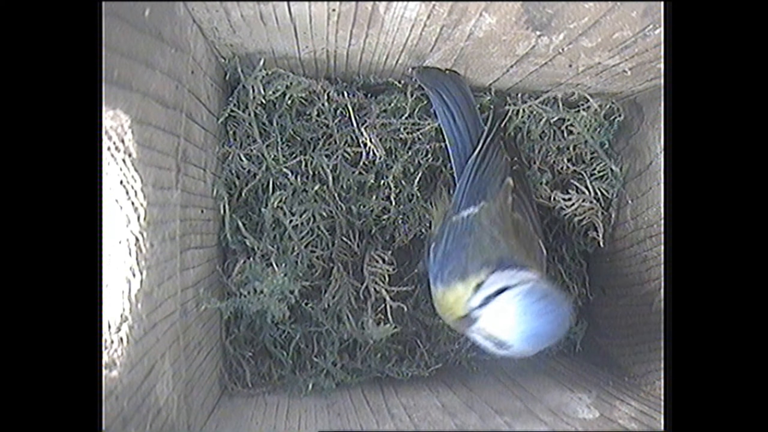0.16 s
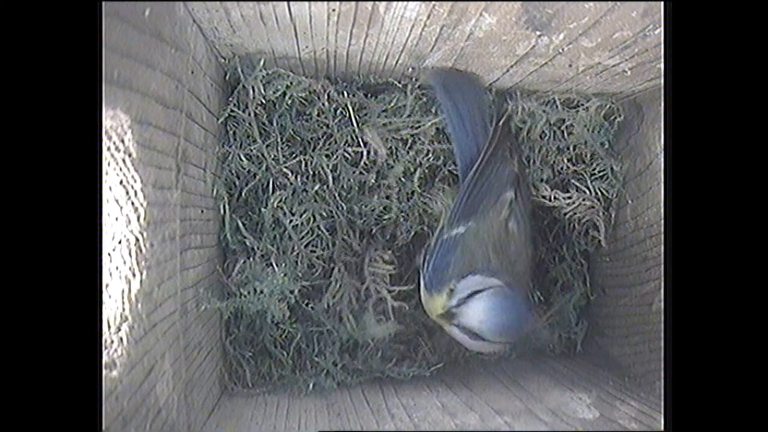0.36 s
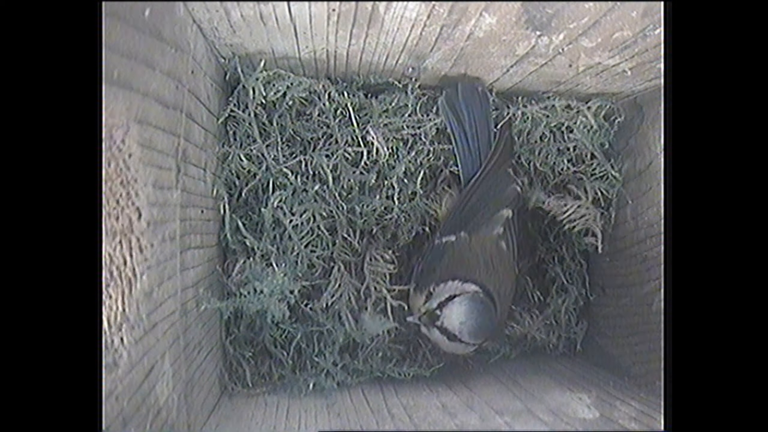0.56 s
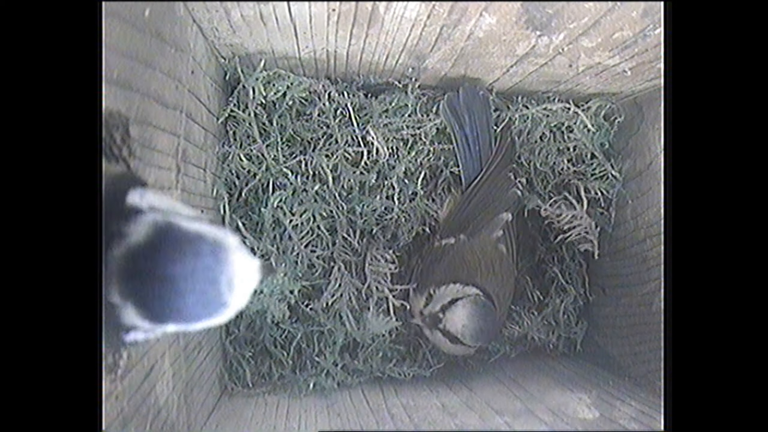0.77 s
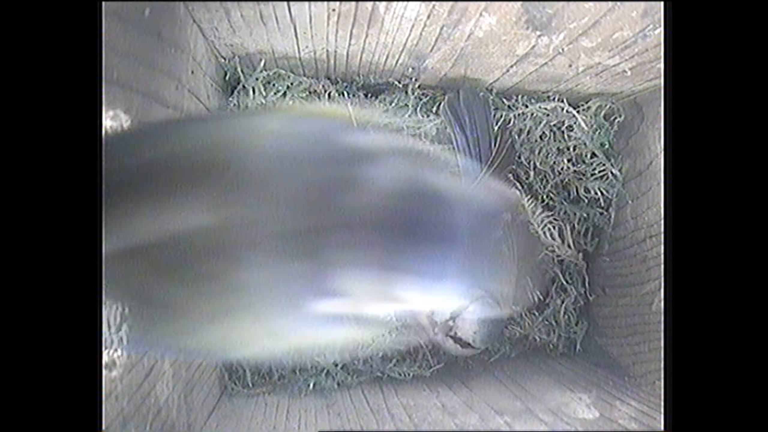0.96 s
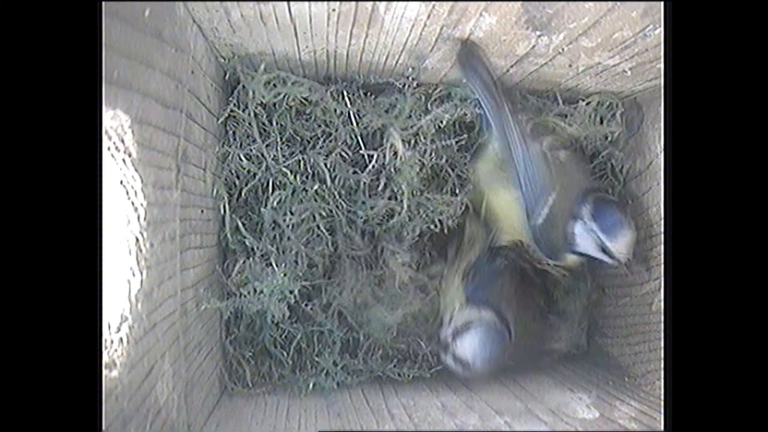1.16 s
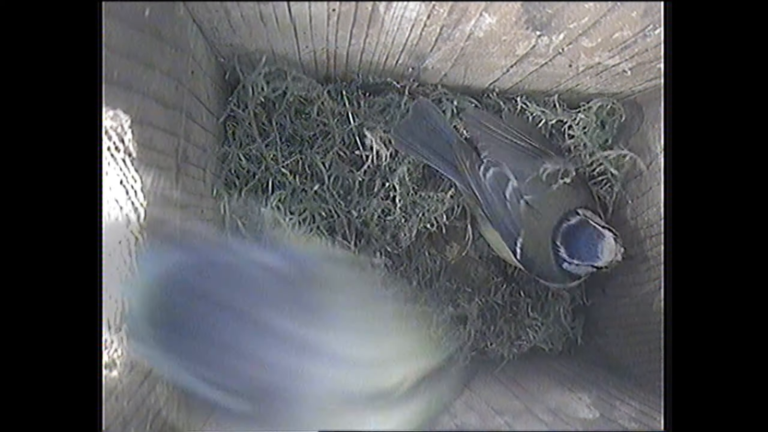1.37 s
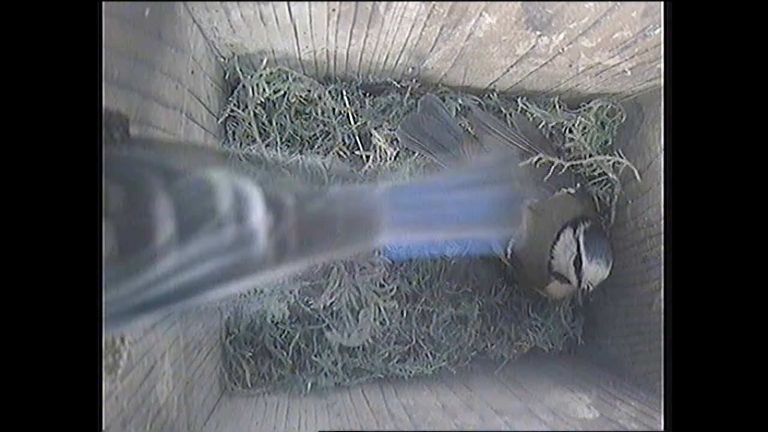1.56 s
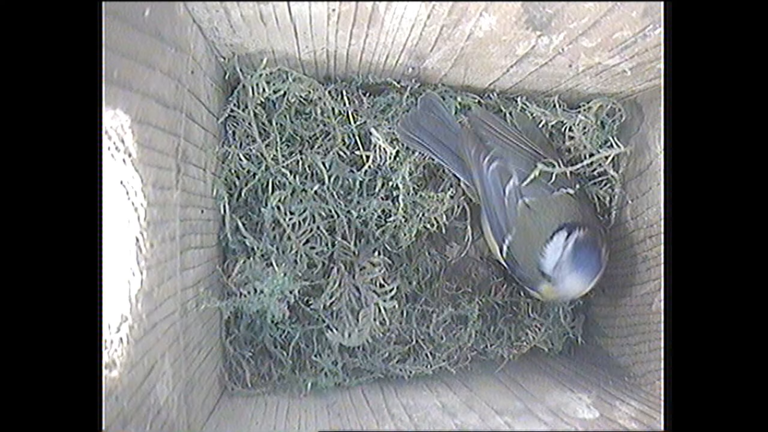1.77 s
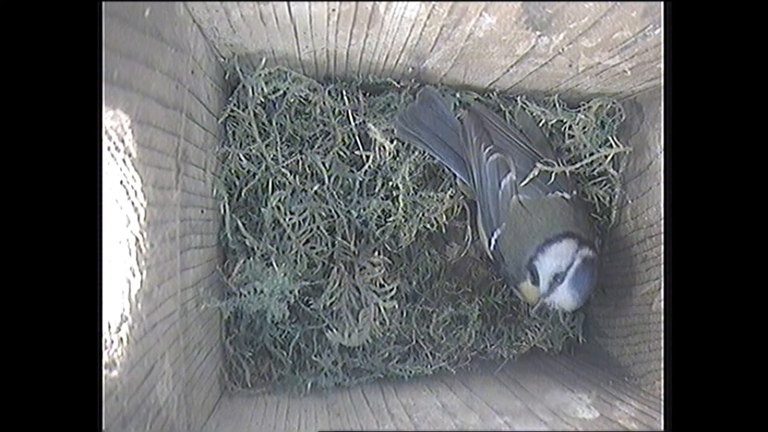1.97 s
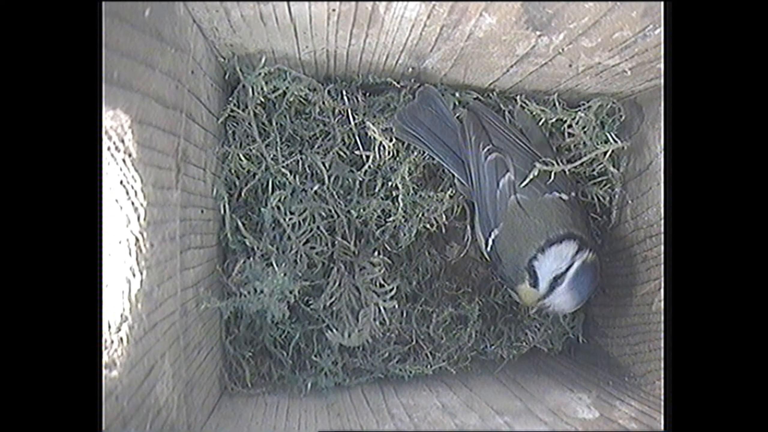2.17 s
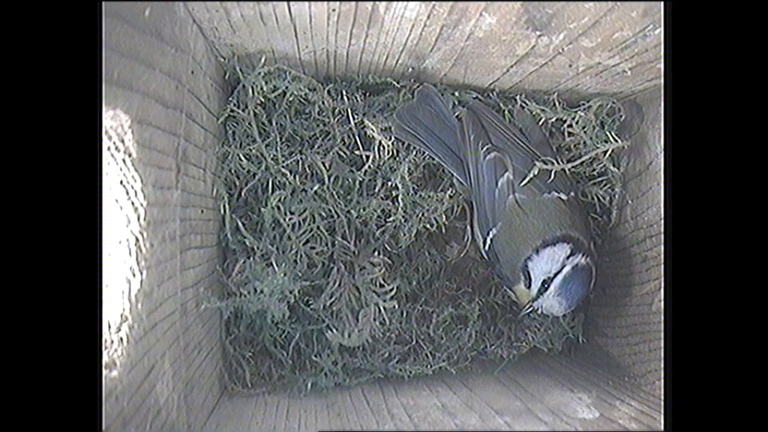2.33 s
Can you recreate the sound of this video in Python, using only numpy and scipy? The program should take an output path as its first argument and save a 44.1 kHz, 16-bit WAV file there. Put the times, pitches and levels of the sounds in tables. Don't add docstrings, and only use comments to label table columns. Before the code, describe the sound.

Two small birds in a wooden nest box: a hard knock and scratch, thin high calls, then a thumping drop into moss, scuffling and fluttering out, close microphone, right channel only, over pumping hollow rumble.

```python
import sys
import numpy as np
from scipy import signal
from scipy.fft import rfft, irfft, next_fast_len
from scipy.io import wavfile
from scipy.ndimage import map_coordinates

SR = 44100
rng = np.random.default_rng(int(sys.argv[2]) if len(sys.argv) > 2 else 0)


def gain_from_db(level_db):
    decades = np.asarray(level_db, float) / 20
    return 10 ** decades


def inscribe(sig):
    pcm = np.round(np.clip(np.atleast_2d(sig).T, -1, 1) * 32767)
    wavfile.write(sys.argv[1], SR, pcm.astype(np.int16))


N = 105840

# f/Hz, width/Hz, level/dB
CAVITY_MODES = [(498, 97, 1), (895, 68, 4.5), (1360, 160, 1), (2340, 180, -4.5), (3454, 120, -7.5),
                (3856, 120, -2), (4326, 130, -5), (6276, 360, -8), (7020, 280, -17.5), (7870, 213, -6),
                (9860, 230, -14.5), (11300, 380, -12.5)]
LINE_HZ = 3906.25


def along(rows):
    s, *cols = np.transpose(rows)
    return [np.interp(np.arange(N) / SR, s, c) for c in cols]


def unit(x):
    return x / np.sqrt(np.mean(x ** 2) + 1e-20)


def filtered(x, response):
    m = next_fast_len(x.shape[-1] + 8192)
    spectrum = rfft(x, m) * response(np.fft.rfftfreq(m, 1 / SR))
    return irfft(spectrum, m)[..., :x.shape[-1]]


def modes(table, f, floor_db):
    response = gain_from_db(floor_db)
    for k, (centre, width, db) in enumerate(table):
        resonance = 1j * f * width / (centre * centre - f * f + 1j * f * width)
        response = response + (-1) ** k * gain_from_db(db) * resonance
    return response


def peak(f, hz, db, octaves):
    return db * np.exp(-(np.log2((f + 1) / hz) / octaves) ** 2)


def wobble(rate):
    knots = rng.standard_normal(int(N * rate / SR) + 4)
    return map_coordinates(knots, [np.arange(N) * rate / SR])


def add(track, s, x):
    part = track[round(s * SR):][:len(x)]
    part += x[:len(part)]


def air():
    # f/Hz, width/Hz, level/dB
    hollow = [(52, 48, -13), (169.6, 32.2, -7), (478.5, 62.6, -14), (806, 214, -26), (1221, 231, -14),
              (1379.3, 132, -10), (1765, 65, -28), (3750, 103, -33)]
    rumble_db, hiss_db = -40.5, -85.5
    noise = rng.standard_normal(N)
    tone = unit(filtered(noise, lambda f: modes(hollow, f, floor_db=-44.5) / (1 + (f / 6000) ** 2)))
    return gain_from_db(rumble_db + wobble(12.72)) * tone + gain_from_db(hiss_db) * rng.standard_normal(N)


def engine():
    # t/s, f/Hz, level/dB
    firing = [
        (0, 54, -83),
        (1.3, 53.5, -56.5),
        (1.75, 53, -40.5),
        (2.1, 51.8, -33.5),
        (2.4, 52, -39),
    ]
    orders = {1: -6.5, 2: -14, 3: -0.5, 4: -9.5, 9: -18.5}
    hz, db = along(firing)
    phase = 2 * np.pi * np.cumsum(hz * (1 + 0.00886 * wobble(7.21))) / SR
    tone = sum(gain_from_db(level + 5.4 * wobble(15)) * np.sin(k * phase + 0.22 * wobble(15))
               for k, level in orders.items())
    return gain_from_db(db) * tone


def buzz():
    field_hz, burst_at_s, burst_s, burst_db = 50, .0178, .0033, -58.5
    t = np.arange(N) / SR
    from_burst_s = (((t - burst_at_s) * field_hz + .5) % 1 - .5) / field_hz
    blank = np.exp(-(from_burst_s / burst_s) ** 4)
    lines = 0
    for k, db in enumerate([-76, -76, -73]):
        level = gain_from_db(db + 3.5 * wobble(70))
        lines = lines + level * np.sin(2 * np.pi * (k + 1) * LINE_HZ * t + .9 * wobble(120))
    hiss = gain_from_db(burst_db + 2 * wobble(40)) * blank * rng.standard_normal(N)
    return hiss + lines * (.7 + blank)


def pushes():
    # t/s, level/dB, f/Hz, length/cycles
    puffs = [(0.201, -26, 126, 1.5), (0.213, -21.5, 53, 0.9), (0.225, -26, 110, 1.2),
             (0.721, -31.5, 101, 2.06), (0.957, -23.5, 164, 2.8), (.974, -14, 154, 1.7),
             (1.01, -29.5, 167, 4), (1.361, -30, 177, 1.2), (1.505, -22, 138.6, 2.8),
             (1.539, -20.5, 100, 0.68), (1.579, -27, 116, 1.7), (1.685, -21.5, 150, 1.94),
             (1.715, -22.5, 59, 2.9), (1.743, -26, 151, 3.1), (1.757, -12.5, 143, 1.65),
             (1.789, -18, 155.6, 5.7), (1.85, -26, 150, 4), (1.901, -30, 157, 4.7),
             (2.156, -32, 159.2, 3.6)]
    out = np.zeros(N)
    for s, db, hz, cycles in puffs:
        turns = np.arange(int(3 * cycles / hz * SR)) / SR * hz
        swell = (2 * turns / cycles) * np.exp(-2 * turns / cycles)
        add(out, s, gain_from_db(db + 3.0) * np.sin(2 * np.pi * turns) * swell)
    return out


def ticks():
    # t/s, level/dB, t60/s, brightest f/Hz
    taps = [(0.2563, -15.5, 0.023, 3970), (.257, -14.5, 0.015, 7100), (.2635, -18.5, 0.016, 4200),
            (0.284, -37, 0.046, 6600), (.698, -59, .03, 4040), (0.709, -54, 0.019, 5540),
            (.758, -50, .03, 4940), (0.881, -54, 0.019, 8500), (.21, -50.5, 0.034, 1430),
            (.9583, -42, .02, 4300), (0.959, -30, .008, 2500), (.965, -52, 0.017, 8000),
            (.9807, -29.5, 0.069, 4100), (1.278, -42, .02, 3800), (1.285, -49, 0.038, 3800),
            (1.29, -49, 0.035, 6200), (1.309, -46, 0.032, 4000), (1.345, -44, 0.028, 6150),
            (1.377, -44, .03, 3900), (1.388, -39, .02, 4300), (1.3, -53, 0.014, 5000),
            (1.32, -54, .015, 6500), (1.334, -46, 0.022, 3900), (1.353, -50, .015, 6900),
            (1.429, -53, 0.028, 3800), (1.496, -51, 0.022, 3000), (1.5138, -38, 0.028, 6360),
            (1.5444, -40, 0.016, 7800), (1.546, -45, 0.069, 4350), (1.587, -47, 0.033, 3940),
            (1.6627, -41, 0.028, 4260), (1.676, -41, 0.018, 7860), (1.683, -41, 0.016, 5600)]
    out, t = np.zeros(N), np.arange(SR // 10) / SR
    luck = rng.standard_normal((len(taps), len(t)))
    for (s, db, t60, hz), noise in zip(taps, luck):
        onset = 1 - np.exp(-t / 0.00031)
        raw = noise * gain_from_db(db + 15 - 60 * t / t60) * onset

        def response(f):
            cavity = modes(CAVITY_MODES, f, floor_db=-24.5) * f / (f + 2500)
            return cavity * gain_from_db(peak(f, hz, db=11, octaves=0.36))

        add(out, s, filtered(raw, response))
    return out


def scrapes():
    # t/s, length/s, level/dB, fall over the stroke/dB, brightest f/Hz
    strokes = [(0.22, 0.14, -64, -8, 2500), (0.269, 0.044, -36.5, 11.5, 4450),
               (0.311, 0.061, -58.5, -7.5, 2380), (.371, 0.02, -47.5, 16, 5700),
               (0.683, 0.038, -56, -6, 990), (0.721, 0.047, -46, -4, 846), (0.873, 0.019, -49, 0, 894),
               (0.934, 0.032, -49.5, -10.5, 3080), (0.956, 0.024, -41.5, -4, 7560),
               (0.983, .11, -36, 14.5, 3770), (1.054, 0.16, -49.5, -6.5, 3650),
               (1.272, 0.026, -52, -7.5, 6160), (1.298, 0.066, -53.5, -8, 5950),
               (1.373, 0.021, -47, -2.5, 4320), (1.396, 0.018, -52, 23, 3970),
               (1.478, 0.039, -55.5, -10, 2680), (1.516, 0.016, -43, 10, 6200),
               (1.536, 0.018, -51.5, 10, 5200), (1.585, 0.015, -53.5, 8, 4460),
               (1.598, 0.053, -58.5, 3, 2960), (1.657, 0.028, -50.5, -8.5, 4700),
               (1.74, 0.096, -56.5, 6.5, 4270), (1.003, 0.14, -62, 0, 2360), (1.198, 0.21, -57.5, -1, 2400),
               (1.83, 0.203, -70, 3, 3550), (2.022, 0.19, -70, -0.5, 3580), (2.2, .18, -71, 0, 3930)]
    rise_share, fade_s, focus_db = 0.092, 0.0056, 7
    grains = rng.standard_normal(N) * gain_from_db(3.2 * wobble(1500) + .7 * wobble(150))
    out = np.zeros(N)
    for s, length, db, fall_db, hz in strokes:
        t = np.arange(int((length + fade_s) * SR)) / SR
        rise = np.clip(t / (rise_share * length), 0, 1)
        fade = np.clip((t[-1] - t) / fade_s, 0, 1) ** 2
        stroke = grains[round(s * SR):][:len(t)] * rise * fade * gain_from_db(db + 15 - fall_db * t / length)
        raw = np.pad(stroke, (0, 2000))

        def response(f):
            tilt_db = -focus_db * np.abs(np.log2((f + 300) / hz))
            colour = gain_from_db(tilt_db + peak(f, hz, db=3.5, octaves=0.087))
            return modes(CAVITY_MODES, f, floor_db=-21.5) * colour

        add(out, s, filtered(raw, response))
    return out


def knocks():
    # t/s, peak level/dB
    blows = [(0.2585, -21.5), (.2612, -11.5), (0.283, -26.5), (.291, -28.5), (0.375, -40.5), (0.708, -39),
             (0.75, -34.5), (0.882, -45.5), (0.946, -50), (0.956, -28), (0.977, -24.5), (1.067, -40),
             (1.386, -25), (1.497, -35.5), (1.513, -34), (1.543, -31.5), (1.586, -29.5), (1.663, -27.5),
             (1.671, -30)]
    # f/Hz, level/dB, t60/s
    panels = [(164, -2.5, 0.053), (390.6, -3.5, 0.083), (430, -6, 0.11), (495.8, 2.5, 0.1),
              (578.7, 4, 0.094), (790, -3, 0.084), (1310, -14.5, 0.017), (1404, -11.5, 0.066),
              (2275, -5, 0.021)]
    out, t = np.zeros(N), np.arange(SR // 4) / SR
    luck = rng.standard_normal((len(blows), 2, len(panels)))
    for (s, db), (size, phase) in zip(blows, luck):
        longer = 1 + 0.01 * (db + 11.5)
        ring = 0
        for (hz, level, t60), g, p in zip(panels, size, phase):
            decay = gain_from_db(level + 2 * g - 60 * t / (t60 * longer))
            ring = ring + decay * np.sin(2 * np.pi * hz * (1 + 0.007 * p) * t + .5 * p)
        add(out, s, gain_from_db(db - 2.0) * ring * (1 - np.exp(-t / 0.0015)))
    return out


def whistle(rows, overtones_db=(), sidebands_db=(), mirror_db=-99, rough=0.092, breath_db=-22):
    hz, db = along(rows)
    t = np.arange(N) / SR
    phase = 2 * np.pi * np.cumsum(hz) / SR + rough * wobble(500)
    line = 2 * np.pi * LINE_HZ * t
    tone = np.sin(phase)
    for k, level in enumerate(overtones_db):
        tone += gain_from_db(level + 0.81 * wobble(150.3)) * np.sin((k + 2) * phase)
    for side, level in zip((-1, 1), sidebands_db):
        tone += gain_from_db(level + 1.34 * wobble(200)) * np.sin(phase + side * line)
    tone += gain_from_db(mirror_db) * np.sin(3 * line - phase)
    breath = gain_from_db(breath_db) * filtered(rng.standard_normal(N), lambda f: f > 2000)
    sounding = (t > rows[0][0]) * (t < rows[-1][0])
    return np.sqrt(2) * gain_from_db(db + 1.3 * wobble(200)) * (tone + breath) * sounding


def calls():
    # t/s, f/Hz, level/dB
    seep_1 = [
        (.43, 8680, -83),
        (.434, 8720, -51),
        (.443, 8600, -50.5),
        (.49, 8470, -46),
        (.496, 8140, -46),
        (.501, 8000, -64),
    ]
    seep_2 = [
        (.728, 8300, -68),
        (.735, 8250, -40),
        (.75, 7990, -38.5),
        (.774, 7950, -45.5),
        (.786, 7560, -60),
        (.794, 7840, -90.5),
    ]
    dip_track = [
        (.498, 3594, -67),
        (.502, 3556, -38),
        (.516, 3250, -39.5),
        (.529, 2265, -48.5),
        (.535, 2330, -46),
        (.543, 3470, -36.5),
        (.555, 3860, -32.5),
        (.572, 4110, -43),
        (.577, 4100, -74),
    ]
    far_chirps = [
        [(.812, 5900, -87), (.816, 5800, -70), (.822, 5700, -92)],
        [(.826, 5500, -99), (.831, 5200, -68), (.842, 4750, -79)],
        [(1.995, 6500, -89.5), (2.005, 6300, -75), (2.025, 5950, -71), (2.035, 5750, -105)],
    ]
    seeps = whistle(seep_1, sidebands_db=[-16, -13], mirror_db=-24)
    seeps = seeps + whistle(seep_2, sidebands_db=[-15, -14])
    dip = whistle(dip_track, overtones_db=[-9, -21, -26], rough=0.78, breath_db=-13.5)
    dip = filtered(dip, lambda f: modes(CAVITY_MODES, f, floor_db=-15.5))
    return seeps + gain_from_db(8.5) * dip + sum(whistle(rows, rough=0.67) for rows in far_chirps)


def scene():
    # t/s, gain/dB
    pump = [(0, -38.5), (.16, -36), (.2, -4.5), (.27, 5.5), (.34, -5.5), (.44, -17), (.5, -6.5),
            (.57, -10.5), (.65, -25.5), (.75, -1), (.81, -19), (.92, -8.5), (.96, 8.5), (1.05, -0.5),
            (1.26, -7), (1.38, -3.5), (1.8, -1), (2.0, -11.5), (2.15, -10.5), (2.4, -10)]
    background = gain_from_db(along(pump)[0]) * (air() + engine() + buzz())
    birds = pushes() + ticks() + scrapes() + knocks() + calls()
    return np.array([np.zeros(N), background + birds])


def top_cut(x):
    return signal.sosfilt(signal.butter(12, 14800, fs=SR, output="sos"), x)


def record(dry):
    band = filtered(dry, lambda f: 1 / (1 + (f / 13500) ** 60))
    return top_cut(band)


dry = scene()
out = record(dry)
inscribe(out)
```